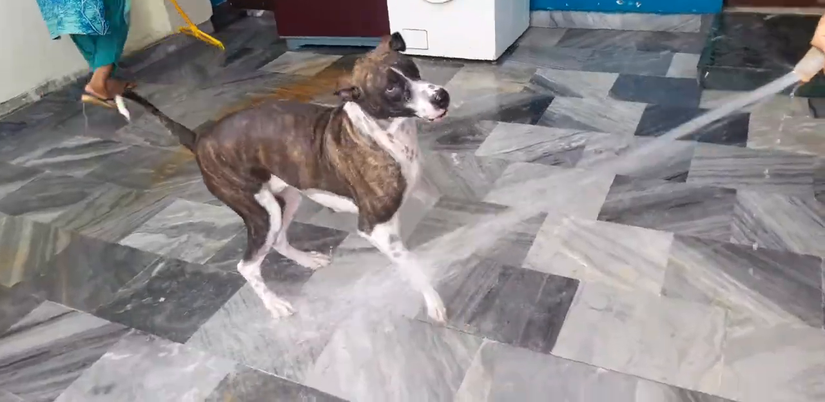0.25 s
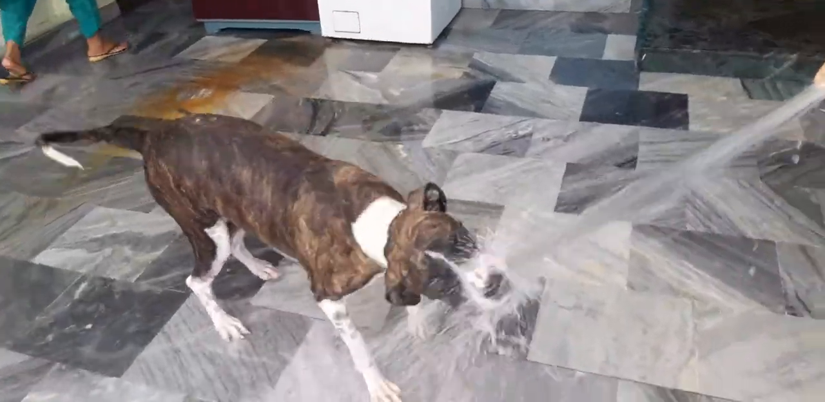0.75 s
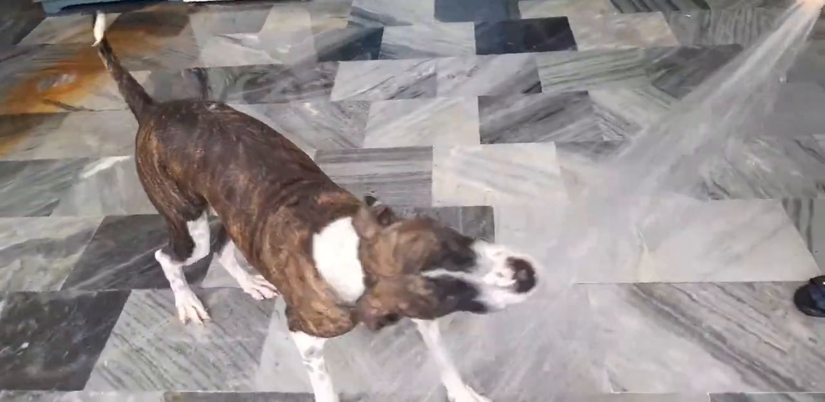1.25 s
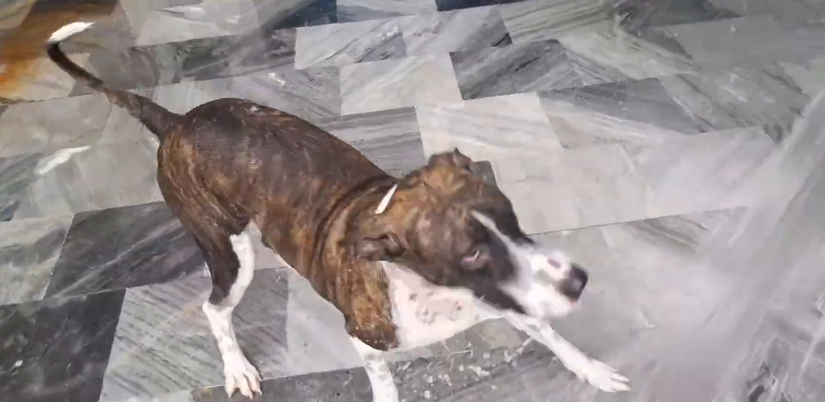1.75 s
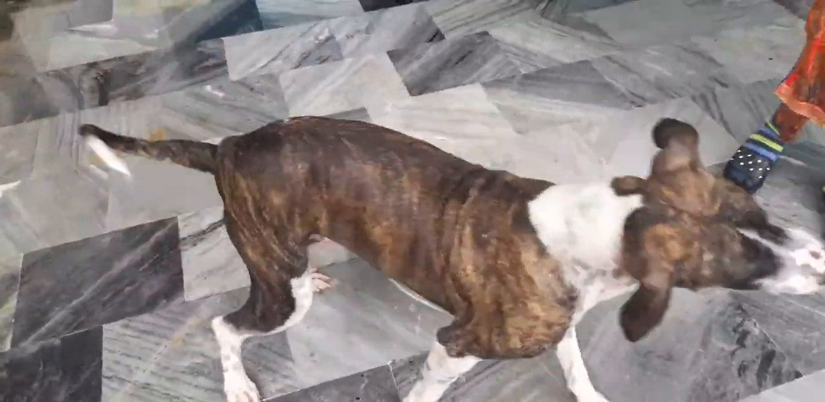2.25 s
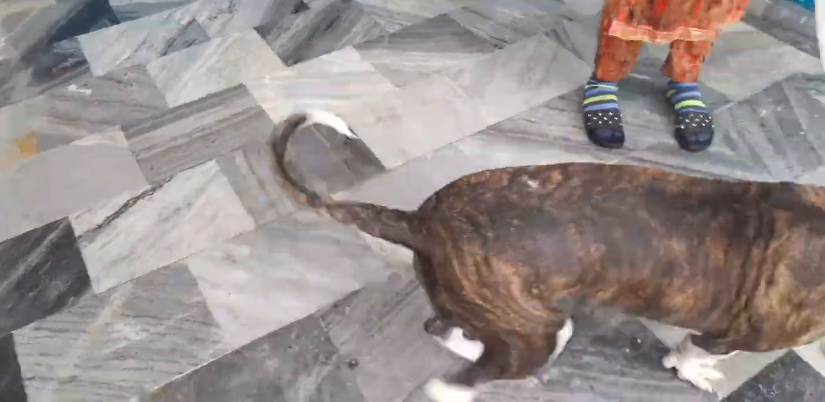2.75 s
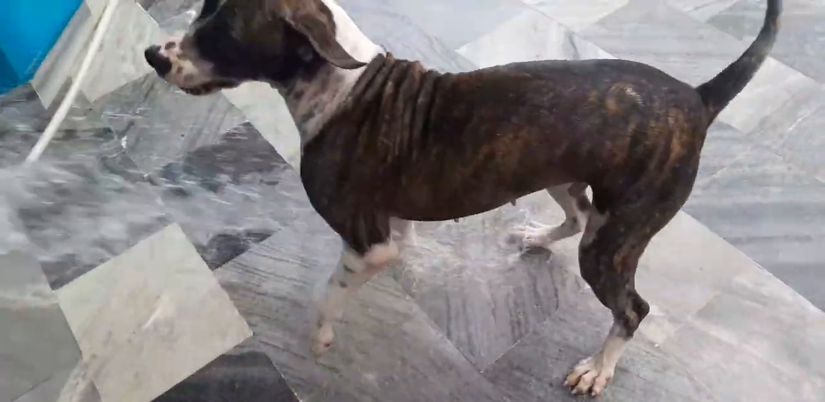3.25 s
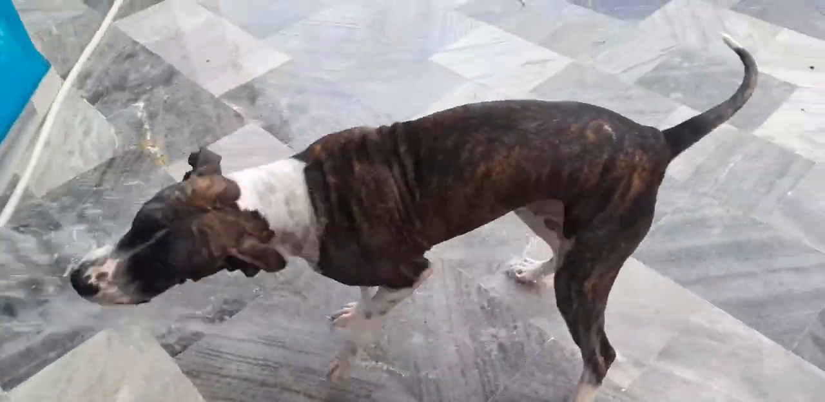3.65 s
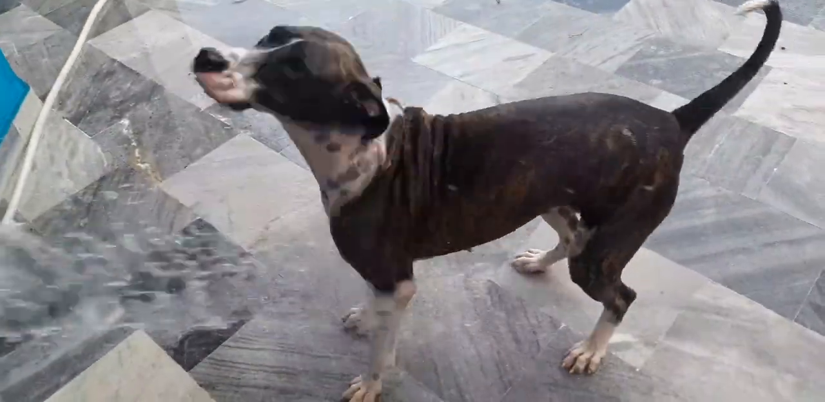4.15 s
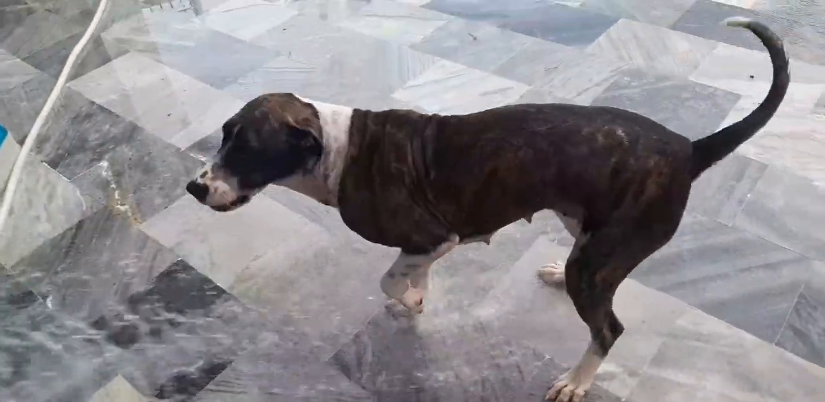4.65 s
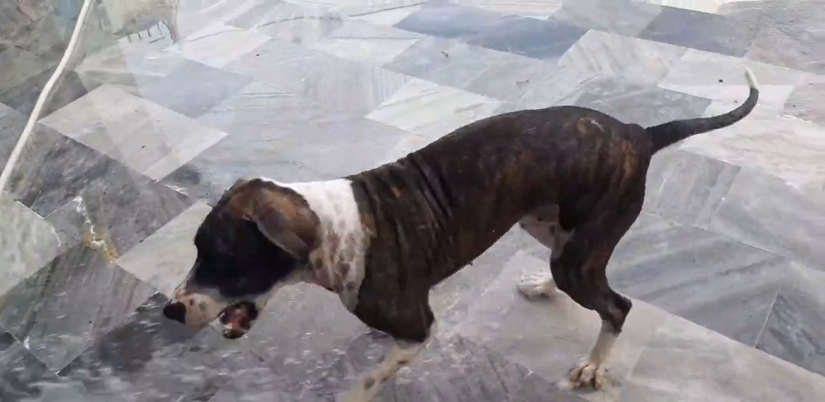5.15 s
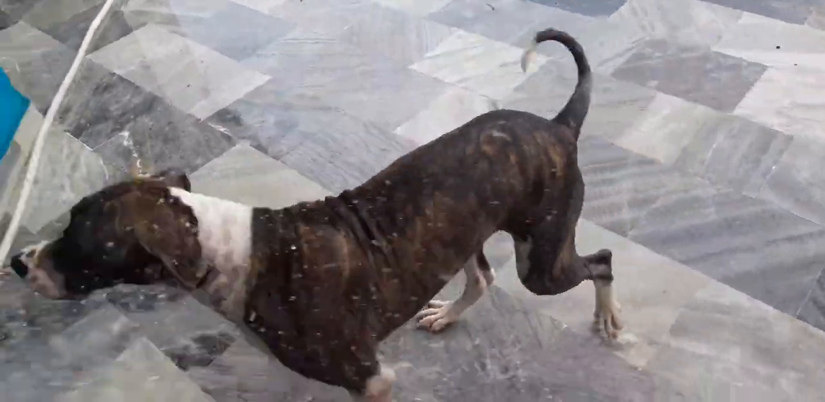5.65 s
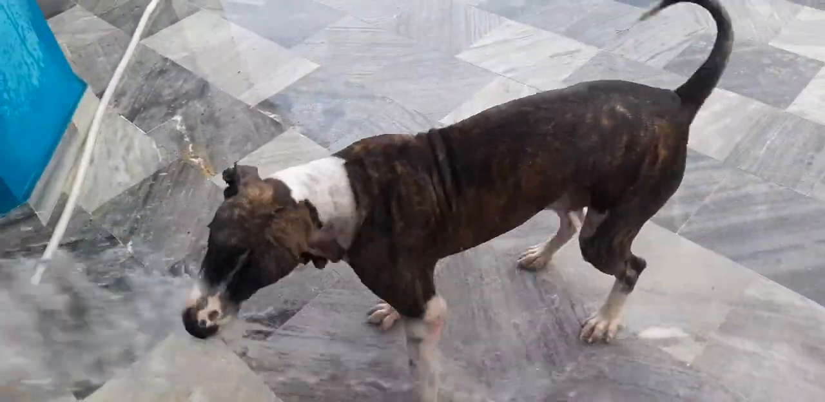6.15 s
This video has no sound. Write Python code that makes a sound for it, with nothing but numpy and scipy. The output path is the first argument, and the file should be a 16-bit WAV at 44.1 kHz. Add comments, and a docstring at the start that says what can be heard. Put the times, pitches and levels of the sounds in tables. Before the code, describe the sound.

Close, continuous water spray on hard wet tiles, surging and dipping as it sweeps, with sharp knocks, plops and churning puddle bubbles.

```python
"""Garden hose on wet tiles

A garden hose sprays a dog on a wet tiled floor, heard from close by in mono.
Fine drops hiss as many tiny clicks and noise; coarse drops spatter in bursts as the jet sweeps about.
The core of the jet drums and churns in standing water, made from random impacts and ringing bubbles.
Noise bursts make a few slaps, short fading tones make plops and knocks, and a thin squeal rings briefly.
A low wavering hum, as of the room answering the drumming jet, is built from tones over a steady rumble.
"""
import sys
import numpy as np
from scipy import signal
from scipy.fft import rfft, irfft, next_fast_len
from scipy.io import wavfile

SR = 44100
rng = np.random.default_rng(int(sys.argv[2]) if len(sys.argv) > 2 else 0)


def store_wav(level_fs):
    """Save 16-bit WAV to argv[1]."""
    pcm = np.round(np.clip(np.atleast_2d(level_fs), -1, 1) * 32767)
    wavfile.write(sys.argv[1], SR, pcm.T.astype(np.int16))


N = 282769  # length in samples

# Strength of the spray as the hose is swung about. Each row: time in seconds, strength in dB.
JET_STRENGTH = [(0.0, -28), (0.12, -24), (0.46, -21), (0.78, -22), (0.90, -30.5), (1.02, -26.5),
                (1.21, -29), (1.36, -26.5), (1.51, -30.5), (1.60, -26.5), (1.69, -29.5), (2.05, -23),
                (2.47, -23.5), (2.60, -21), (2.69, -23), (3.08, -25), (3.30, -24.5), (4.20, -25.3),
                (4.80, -23.3), (5.30, -22), (5.45, -23.5), (5.72, -24.5), (6.12, -23.5), (6.41, -24.5)]
# Drop sizes: how much of each there is. Each row: time in seconds, then mist, medium drops and
# coarse drops, each in dB against the spray strength.
DROP_SIZES = [(0.0, -4.5, -8, -16), (0.7, -3.0, -6.5, -21.5), (1.2, -5, -7, -17.5), (2.3, -6.3, -5, -20),
              (3.3, -7, -6, -19), (4.15, -5, -6.7, -19), (4.85, -7.5, -5, -28.5), (5.6, -6.5, -8, -22),
              (6.41, -7, -6, -13)]
# The jet catches the dog or a film of water and throws coarse drops.
# Each row: start in seconds, length in seconds before the fall, strength in dB before mixing.
SWEEPS = [(0.0, 0.093, -43.5), (0.71, 0.099, -33.5), (0.85, 0.15, -45), (1.28, 0.2, -39.5),
          (1.74, 0.037, -42), (1.98, 0.52, -47), (2.53, 0.14, -35), (2.67, 0.098, -33),
          (2.84, 0.053, -31.5), (3.62, 0.11, -39), (3.78, 0.074, -36), (3.93, .05, -38), (4.245, .15, -41),
          (4.73, .10, -43), (5.385, .17, -33), (5.78, 0.034, -37), (6.11, 0.044, -34.5),
          (6.27, 0.12, -40.5)]
# Tone colour of medium drops. Each row: frequency in Hz, filter gain in dB before levelling.
MEDIUM_COLOUR = [(1200, -21.5), (2200, -15), (3000, -9), (4000, -3), (5400, -0.5), (6200, -2), (7200, -4.5),
                 (9500, -32)]
# Tone colour of fine drops. Each row: frequency in Hz, filter gain in dB before levelling.
FINE_COLOUR = [(4000, -33.5), (6200, -12.5), (7200, -3), (8250, 1), (8900, -2.5), (9600, -9.5),
               (10300, -18.5), (12000, -19)]
# Tone colour of mist. Each row: frequency in Hz, filter gain in dB before levelling.
MIST_COLOUR = [(8500, -41), (10300, -7.5), (11600, 2), (12600, 0.5), (13700, 2), (16000, -4)]
# Tone colour of coarse drops bursting. Each row: frequency in Hz, filter gain in dB before levelling.
COARSE_COLOUR = [(300, -31), (700, -6), (1200, -6.5), (2200, -2), (3000, 0), (5000, -4), (10000, -15)]
# Core of the jet drumming, louder as it comes near. Each row: time in seconds, strength in dB.
DRUM_STRENGTH = [(0.0, -44.5), (0.45, -41.5), (0.98, -49), (1.72, -48.5), (2.2, -35.5), (2.62, -36.5),
                 (3.25, -33.5), (4.05, -36), (4.7, -36), (5.55, -34.5), (6.41, -32)]
# The jet digs into standing water and the bubbling surges.
# Each row: start in seconds, length in seconds before the fall, strength in dB before mixing.
SURGES = [(0.62, .27, -45.5), (1.28, 0.4, -50), (2.52, 0.43, -40), (2.82, .08, -34.5), (3.12, 0.11, -33),
          (4.15, .25, -41.5), (4.81, 0.1, -38.5), (5.40, 0.18, -35), (5.72, 0.2, -32), (6.10, 0.24, -33.5)]
# Tone colour of the drumming. Each row: frequency in Hz, filter gain in dB before levelling.
DRUM_COLOUR = [(22, -45), (45, -46), (75, -7.5), (110, -5.5), (170, 1), (260, -1.5), (380, -6.5),
               (600, -15.5), (1200, -16), (3000, -46)]
# Tone colour of the churning. Each row: frequency in Hz, filter gain in dB before levelling.
CHURN_COLOUR = [(180, -51), (350, 2), (480, 1), (700, -5.5), (1000, -9.5), (1500, -20), (3000, -28)]
# Strength of the low hum. Each row: time in seconds, strength in dB before its tones are weighted.
HUM_STRENGTH = [(0, -47.5), (1.15, -63), (1.5, -52), (2.2, -46), (5.6, -45), (6.0, -37.5), (6.41, -32.5)]
# Tones of the low hum. Each row: middle pitch in Hz, typical level in dB against the hum strength.
HUM_TONES = [(55, -14), (142, 1.5), (226, -5)]
# Distant rumble. Each row: frequency in Hz, filter gain in dB before levelling.
RUMBLE_COLOUR = [(30, -16), (60, -8), (90, -0.5), (130, -2.5), (210, -9), (400, -13), (1000, -19),
                 (4000, -50)]
# Slaps of water and wet knocks. Each row: start in seconds, starting level in dB before the room,
# centre in Hz, width in octaves, time to fall by 60 dB in seconds.
SLAPS = [(0.264, -33, 1440, 0.73, 0.59), (0.593, -26, 3700, 0.85, 0.16), (0.72, -40, 1090, 0.88, 0.93),
         (0.89, -36, 696, 1.3, 0.13), (1.718, -40, 990, 2.7, 0.33), (1.865, -38, 1950, 0.9, 0.31),
         (2.529, -29, 1100, 1.9, 0.34), (3.789, -24, 2000, 2.3, 0.018), (3.96, -35.5, 905, 0.83, 0.44),
         (5.877, -30, 900, 1.1, 0.045), (6.285, -25, 680, 2.6, 0.11), (6.303, -26, 980, 0.64, 0.17)]
# Thin squeal, as of something rubbed on the wet tiles. Each row: time in seconds, strength in dB.
SQUEAL_STRENGTH = [(0.3, -70), (0.51, -44), (0.545, -33.5), (0.62, -30.5), (0.72, -35), (0.77, -45),
                   (0.9, -80)]
# Resonances of the squeal. Each row: centre in Hz, width in Hz, level in dB against its strength.
SQUEAL_MODES = [(3000, 60, -11), (3415, 50, 0), (3840, 60, -10)]
# Single big drops and knocks. Each row: start in seconds, starting peak in dB before the room,
# pitch in Hz, time to fall by 60 dB in seconds.
PLOPS = [(1.864, -21.5, 2070, 0.0083), (2.527, -21, 1010, 0.014), (3.408, -28, 1000, .012),
         (3.79, -11, 2020, 0.0022), (3.9566, -7.5, 1130, 0.0041), (3.9592, -21, 690, 0.011),
         (5.524, -11, 2400, .002), (5.541, -16, 2900, .002), (5.555, -14, 1900, .002),
         (6.286, -17.5, 760, .04), (6.303, -23, 1010, 0.047)]
# Resonances of the tiled space. Each row: centre in Hz, width in Hz, gain in dB.
ROOM_MODES = [(76, 4, -4), (190.5, 3, -3), (229.4, 2.3, 3.5), (291, 9.5, -1), (568, 5, 0), (1020, 8.4, -10),
              (1646, 10, -4)]

WAVER_DB, WAVER_HZ = 0.62, 5.5  # the hand is never still: the spray wavers
SWEEP_ATTACK_S, SWEEP_RELEASE_S = 0.015, 0.045
SWEEP_MEDIUM_DB = 2  # medium drops thrown in a sweep, against the sweep strength
FINE_DB = -1.0  # fine drops against the spray strength
SURGE_ATTACK_S, SURGE_RELEASE_S = 0.036, 0.18
PUDDLE_DB = -7  # steady bubbling against the drumming strength
RUMBLE_CUT_HZ, CUTOFF_HZ = 52, 15700


def from_db(db):
    """Turn decibels into a gain."""
    return 10 ** (np.asarray(db) / 20)


def rms_one(x):
    """Scale a sound to an average (rms) level of 1."""
    return x / np.sqrt(np.mean(x ** 2) + 1e-20)


def in_time(rows):
    """Join the points of each column with straight lines, one value per sample."""
    seconds, *columns = np.transpose(rows)
    return [np.interp(np.arange(N) / SR, seconds, column) for column in columns]


def drift(rate_hz):
    """Wander at random with spread 1: noise smoothed twice, so it moves at about this rate."""
    step = 40  # samples between the slow points
    r = np.exp(-2 * step * np.pi * rate_hz / SR)
    noise = rng.standard_normal(N // step + 2002)
    slow = signal.lfilter([1], [1, -2 * r, r * r], noise)[2000:]  # skip the filter's start
    return np.interp(np.arange(N) / step, np.arange(len(slow)), rms_one(slow))


def coloured(x, colour):
    """Filter a sound through a smooth gain curve, then level it to rms 1."""
    size = next_fast_len(N)
    hz, db = np.transpose(colour)
    bins = np.maximum(np.fft.rfftfreq(size, 1 / SR), 1)
    gain = from_db(np.interp(np.log(bins), np.log(hz), db))
    return rms_one(irfft(rfft(x, size) * gain, size)[:N])


def butter(x, hz, kind):
    """Apply a Butterworth filter of order two."""
    sos = signal.butter(2, np.clip(hz, 10, .45 * SR), kind, fs=SR, output="sos")
    return signal.sosfilt(sos, x)


def resonance(x, hz, width):
    """Ring at a narrow resonance with gain 1 at its top."""
    r = np.exp(-np.pi * width / SR)
    top = np.array([1, 0, -1]) * (1 - r * r) / 2
    return signal.lfilter(top, [1, -2 * r * np.cos(2 * np.pi * hz / SR), r * r], x)


def impacts(per_s, spread_db):
    """Drops land at random as single clicks, most small and a few large."""
    sizes = from_db(spread_db * np.minimum(rng.exponential(1, N), 5))
    signs = rng.choice([-1, 1], N)
    return sizes * signs * (rng.random(N) < per_s / SR)


def bubbles(low_hz, high_hz, cycles, rise, spread_db, count):
    """Trapped air rings for some cycles and rises in pitch as it nears the surface; rms 1."""
    out = np.zeros(N)
    for when, where, size, life in rng.random((count, 4)):
        hz = low_hz * (high_hz / low_hz) ** where
        start = int(when * N)
        t60 = cycles * (.5 + life) / hz  # seconds to fall by 60 dB
        t = np.arange(min(int(t60 * SR), N - start)) / SR
        gain = from_db(-spread_db * np.log(size + .01) - 60 * t / t60)
        out[start:start + len(t)] += gain * np.sin(2 * np.pi * hz * t * (1 + rise * t / t60))
    return rms_one(out)


def swells(rows, attack_s, release_s):
    """Let events rise, hold and die away; overlapping ones add in power."""
    t, power = np.arange(N) / SR, 0
    for start, length, db in rows:
        rising = np.clip((t - start) / attack_s, 0, 1)
        falling = np.exp(-np.maximum(t - start - length, 0) / release_s)
        power = power + (from_db(db) * rising * falling) ** 2
    return np.sqrt(power)


def spray(jet, sweep):
    """Thousands of tiny impacts over their own smooth wash; the smaller the drops, the higher they hiss."""
    drops = rms_one(impacts(per_s=6000, spread_db=3.4))
    # a drop takes a moment to flatten:
    # two all-pass filters spread each click over a fraction of a millisecond
    drops = drops - 2 * resonance(drops, 8000, 1500)
    drops = drops - 2 * resonance(drops, 5000, 2500)
    fizz = bubbles(2754, 9630, cycles=37, rise=0.025, spread_db=3.0, count=3000)
    mist_db, medium_db, _ = in_time(DROP_SIZES)
    medium = np.hypot(from_db(medium_db) * jet, from_db(SWEEP_MEDIUM_DB) * sweep)
    fine = from_db(FINE_DB) * jet
    mist = from_db(mist_db) * jet
    out = 0
    for gain, colour in ((medium, MEDIUM_COLOUR), (fine, FINE_COLOUR), (mist, MIST_COLOUR)):
        wash = from_db(3) * rng.standard_normal(N)
        hiss = coloured(drops + wash + from_db(-11) * fizz, colour)
        out = out + gain * from_db(0.32 * drift(30)) * hiss
    return out


def spatter(jet, sweep):
    """Coarse drops burst on the film and leave small bubbles: a few all the time, many in a sweep."""
    _, _, coarse_db = in_time(DROP_SIZES)
    bursts = rms_one(impacts(per_s=1200, spread_db=3.5)) + from_db(5.5) * rng.standard_normal(N)
    ringing = from_db(-11) * bubbles(900, 3200, cycles=20, rise=.06, spread_db=3.0, count=1500)
    steady = from_db(coarse_db + 1.1 * drift(9.9)) * jet
    return np.hypot(steady, sweep) * (from_db(2.0) * coloured(bursts, COARSE_COLOUR) + ringing)


def core():
    """The solid part of the jet drums on the floor and beats large bubbles into the puddle."""
    drum_db, = in_time(DRUM_STRENGTH)
    surges = swells(SURGES, SURGE_ATTACK_S, SURGE_RELEASE_S)
    bubbling = np.hypot(from_db(drum_db + PUDDLE_DB), surges)
    drum = coloured(impacts(per_s=3000, spread_db=1.5), DRUM_COLOUR)
    churn = coloured(impacts(per_s=1500, spread_db=1.0), CHURN_COLOUR)
    gurgle = from_db(-9) * bubbles(350, 1000, cycles=13, rise=.15, spread_db=2.0, count=1100)
    return from_db(drum_db) * drum + bubbling * (from_db(-1) * churn + gurgle)


def low_hum():
    """Low tones waver together in pitch and separately in strength, over a steady rumble."""
    hum_db, = in_time(HUM_STRENGTH)
    # a clock that runs slightly fast and slow bends all the tones alike
    clock = np.cumsum(1 + 0.012 * drift(4.5)) / SR
    hum = 0
    for hz, db in HUM_TONES:
        hum = hum + from_db(db + 3.7 * drift(8.8)) * np.sin(2 * np.pi * hz * clock)
    rumble = from_db(-52.5) * coloured(rng.standard_normal(N), RUMBLE_COLOUR)
    return from_db(hum_db) * hum + rumble


def slaps():
    """Each slap is a sudden burst of noise that dies away, lasting half a second at most."""
    out, t = np.zeros(N), np.arange(SR // 2) / SR
    for seconds, db, hz, octaves, t60 in SLAPS:
        edges = hz * 2 ** (np.array([-.5, .5]) * octaves)
        burst = rms_one(butter(rng.standard_normal(len(t)), edges, "band"))
        start = int(seconds * SR)
        out[start:start + len(t)] += (burst * from_db(db - 60 * t / t60))[:N - start]
    return out


def squeal():
    """Friction holds a few resonances in a wavering tone, with rough slips on top."""
    squeal_db, = in_time(SQUEAL_STRENGTH)
    slips, out = impacts(per_s=2900, spread_db=2.0), 0
    for hz, width, db in SQUEAL_MODES:
        turns = np.cumsum(hz + .4 * width * drift(70)) / SR
        tone = np.sin(2 * np.pi * turns) * from_db(2 * drift(60))
        rough = from_db(-7) * rms_one(resonance(slips, hz, width))
        out = out + from_db(db) * rms_one(tone + rough)
    return from_db(squeal_db) * out


def plops():
    """A big drop or knock rings as a single tone that quickly dies away."""
    out, t = np.zeros(N), np.arange(SR // 10) / SR
    for seconds, db, hz, t60 in PLOPS:
        start = int(seconds * SR)
        out[start:start + len(t)] += from_db(db - 60 * t / t60) * np.sin(2 * np.pi * hz * t)
    return out


def room(x):
    """Standing waves between the hard walls colour the splashing."""
    return x + sum(from_db(db) * resonance(x, hz, width) for hz, width, db in ROOM_MODES)


def scene():
    """One jet drives the spray and the spatter; all sources are alike in both channels."""
    jet_db, = in_time(JET_STRENGTH)
    jet = from_db(jet_db + WAVER_DB * drift(WAVER_HZ))
    sweep = swells(SWEEPS, SWEEP_ATTACK_S, SWEEP_RELEASE_S)
    splashing = spatter(jet, sweep) + core() + slaps() + plops()
    mono = spray(jet, sweep) + room(splashing) + squeal() + low_hum()
    return np.stack([mono, mono])


def record(dry):
    """The microphone drops the deepest rumble; the top is cut steeply."""
    thin = butter(butter(dry, RUMBLE_CUT_HZ, "high"), RUMBLE_CUT_HZ, "high")
    top_cut = signal.ellip(12, .1, 90, CUTOFF_HZ, fs=SR, output="sos")
    return signal.sosfilt(top_cut, thin)


dry = scene()
out = record(dry)
store_wav(out)
```